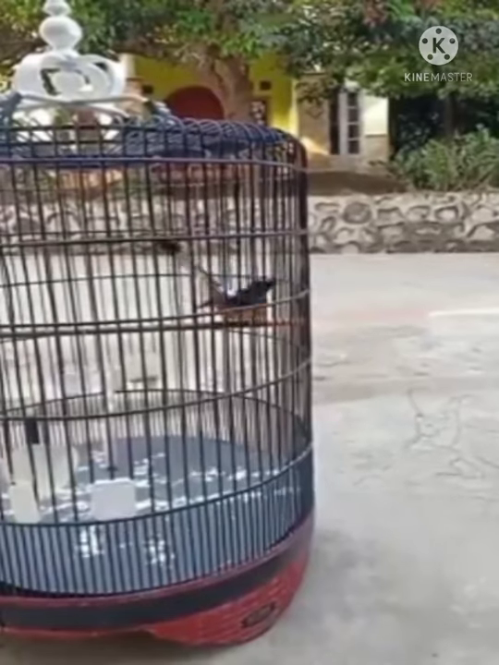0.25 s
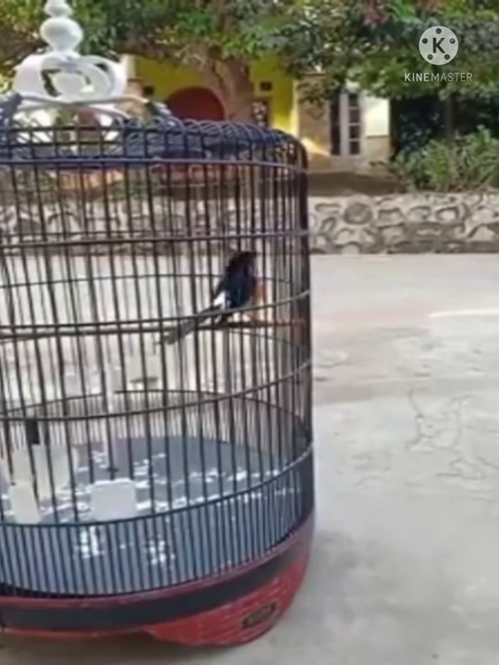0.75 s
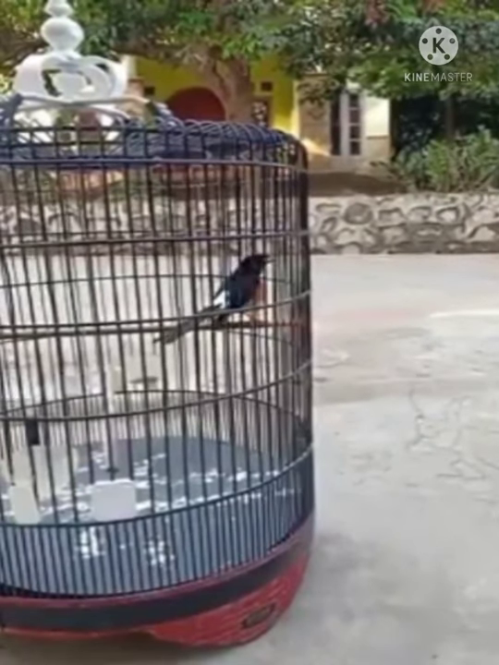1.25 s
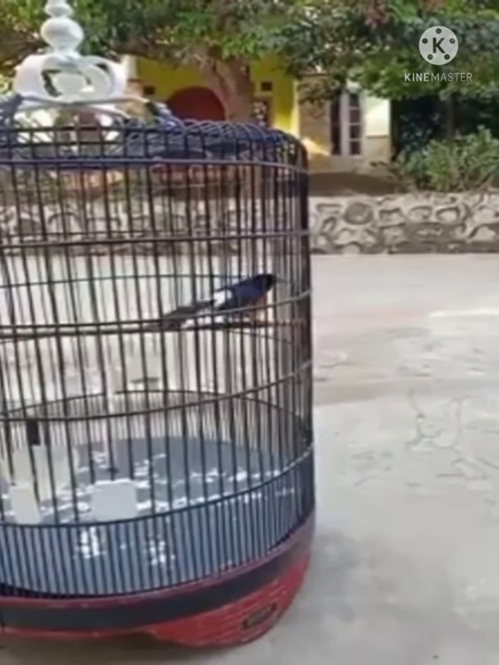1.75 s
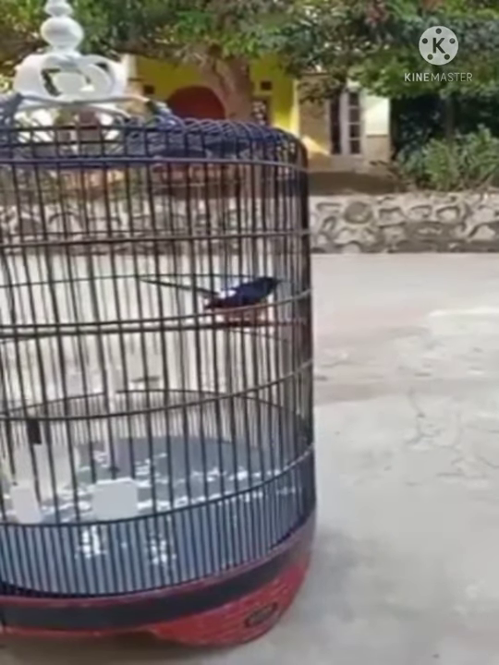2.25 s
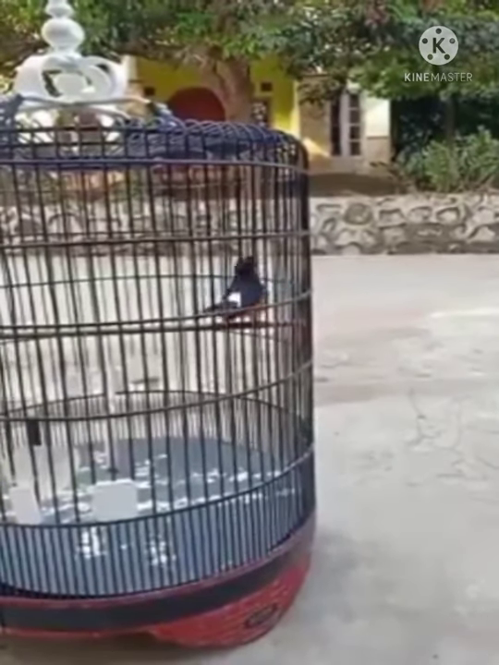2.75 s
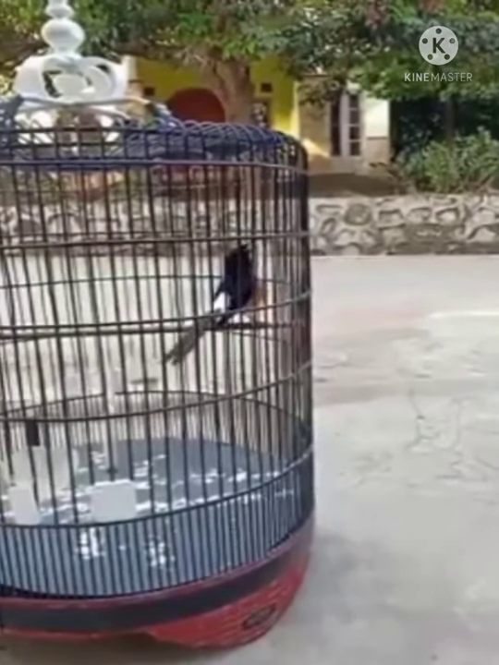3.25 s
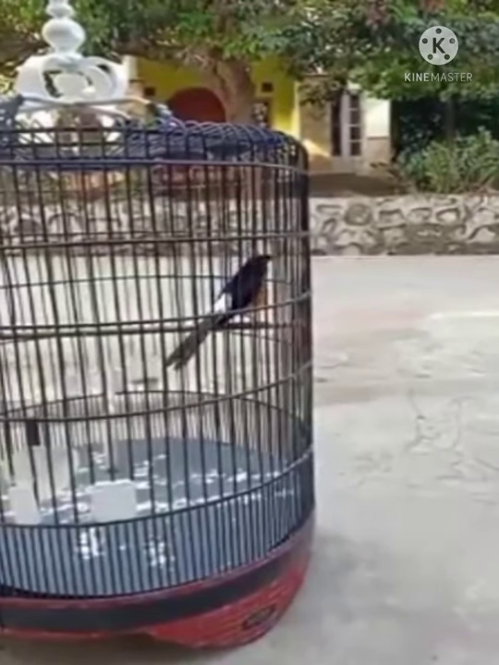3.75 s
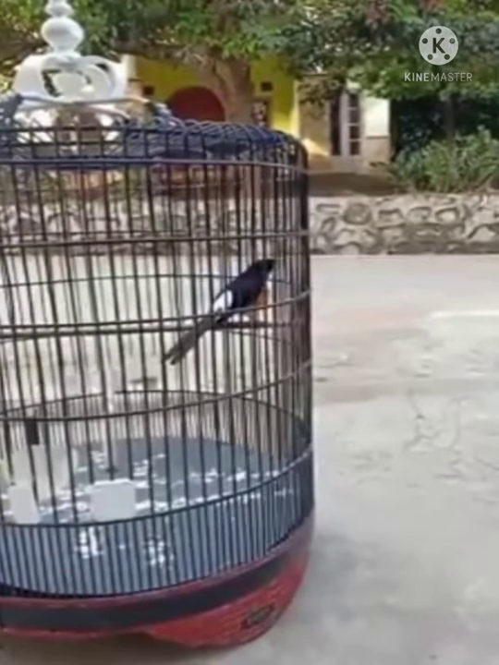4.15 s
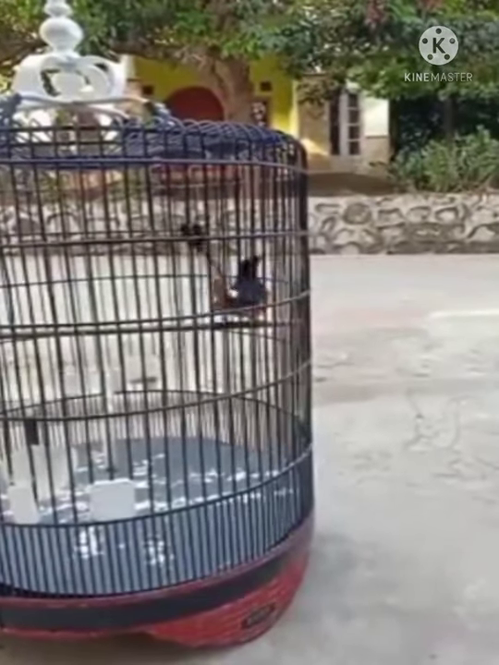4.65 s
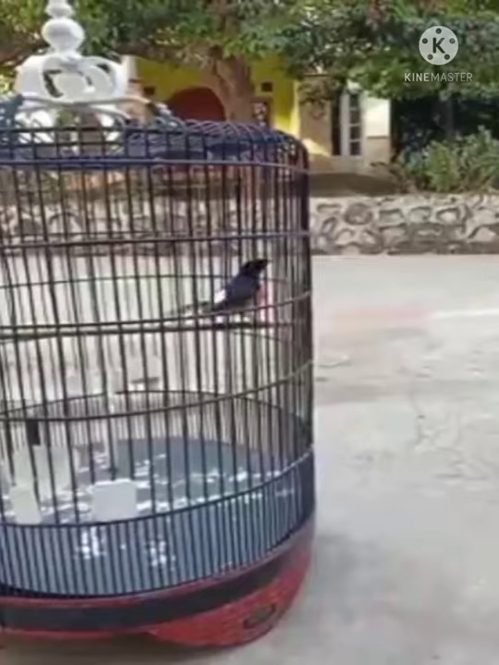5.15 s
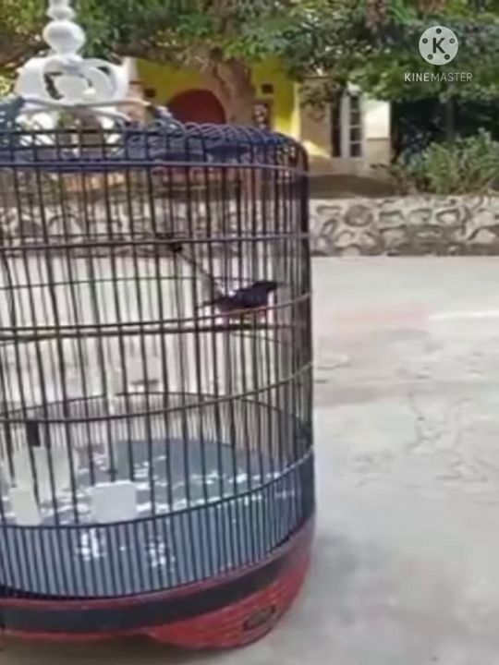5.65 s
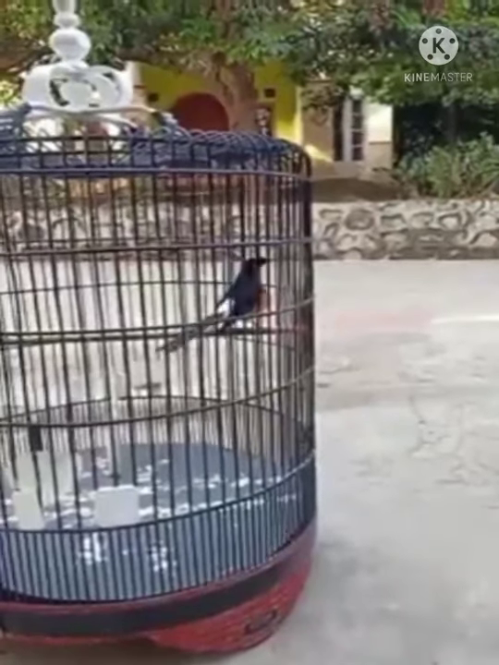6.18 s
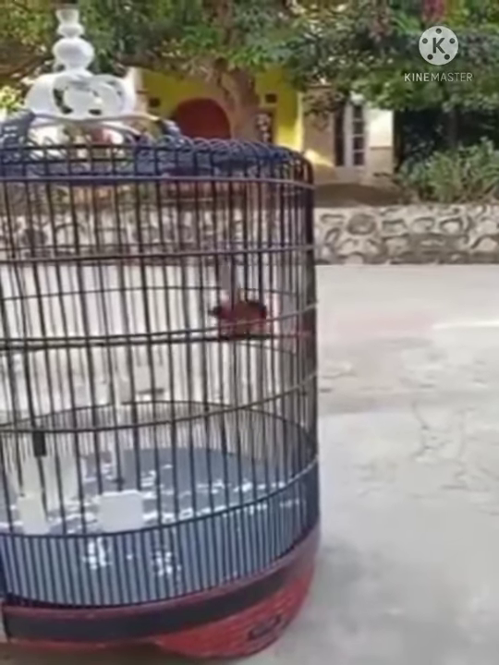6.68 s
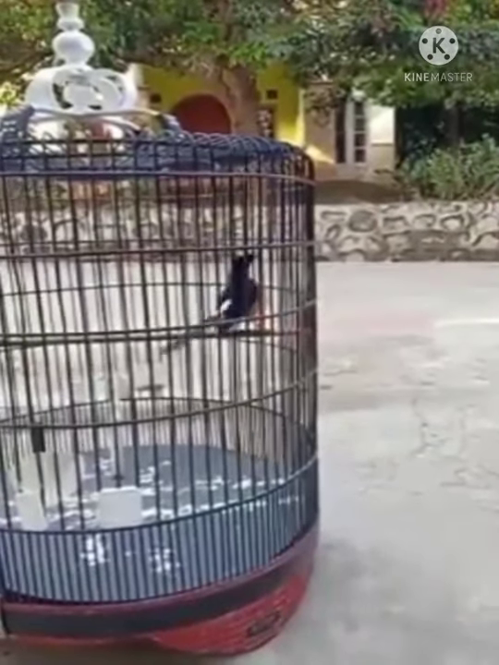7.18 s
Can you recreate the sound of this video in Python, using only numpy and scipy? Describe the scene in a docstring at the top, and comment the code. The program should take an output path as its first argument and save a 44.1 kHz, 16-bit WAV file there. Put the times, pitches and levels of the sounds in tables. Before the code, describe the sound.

A caged songbird close to the microphone chirps, then gives two loud, clear whistles, one rising and one sinking. Two quick phrases of yelps, swooping trills and hoarse squeals follow. A distant vehicle passes while other birds whistle farther off, and the songbird returns with three harsh rasps and a sharp chirp. A low engine putter and a wash of traffic lie underneath, in a yard with a slight echo.

```python
"""A few short chirps sound close by, over a puttering engine and a wash of traffic: a caged shama in a
paved yard. Its syrinx, a self-sustained oscillator, gives near-sine whistles, yelps, swooping trills and
squeals; irregular vibration turns them hoarse, and late in the song come a nasal chack and harsh rasps.
The walls throw the song back, other birds whistle farther off, and a distant vehicle passes.
The engine's firings ring its exhaust. The loudest notes overload the recorder."""
import sys
import numpy as np
from scipy import signal
from scipy.fft import rfft, irfft, next_fast_len
from scipy.io import wavfile
from scipy.ndimage import uniform_filter1d

SR = 44100
rng = np.random.default_rng(int(sys.argv[2]) if len(sys.argv) > 2 else 0)


def waveform_to_disk(signal):
    """Save audio, clipped to [-1, 1], as 16-bit WAV at the path in sys.argv[1]."""
    frames = np.transpose(np.atleast_2d(signal))
    scaled = np.clip(frames, -1, 1) * 32767
    samples = np.round(scaled).astype(np.int16)
    wavfile.write(sys.argv[1], SR, samples)


N = 327222
TIME = np.arange(N) / SR
PROGRESS = np.linspace(0, 1, 41)  # share of a note's length


def gain_of(db):
    """Amplitude grows tenfold every 20 dB."""
    return 10 ** (np.asarray(db) / 20)


def unit_rms(x):
    """Normalisation to rms 1."""
    return x / np.sqrt(np.mean(x ** 2) + 1e-20)


def value_at(spectrum, hz):
    """Interpolation on a log-frequency axis."""
    f, value = np.transpose(spectrum)
    return np.interp(np.log(hz + 1), np.log(f + 1), value)


def follow(rows, t=None):
    """Linear interpolation: times, then each column of a curve, sample by sample."""
    s, *columns = np.transpose(rows)
    t = np.arange(s[0], max(s[-1], s[0] + .005), 1 / SR) if t is None else t
    return [t] + [np.interp(t, s, c) for c in columns]


def add(mix, s, sound):
    """Superposition: a sound joins the mix at s seconds."""
    part = mix[max(round(s * SR), 0):][:len(sound)]
    part += sound[:len(part)]


def wander(size, hz):
    """Low-pass noise: a random drift of rms about 1, with its cutoff at hz."""
    length = next_fast_len(size + SR // 4)
    f = np.fft.rfftfreq(length, 1 / SR)
    return unit_rms(irfft(rfft(rng.standard_normal(length)) / (1 + (f / hz) ** 4), length))[:size]


def faded(x, edge_s=0.0016):
    """A raised-cosine taper keeps a note's ends from clicking."""
    t = np.arange(len(x)) / SR
    return x * np.sin(np.pi / 2 * np.clip(np.minimum(t, t[-1] - t) / edge_s, 0, 1)) ** 2


def filtered(x, spectrum):
    """Linear filtering: each frequency is scaled by the spectrum's gain."""
    length = next_fast_len(len(x) + 2048)
    response = gain_of(value_at(spectrum, np.fft.rfftfreq(length, 1 / SR)))
    return irfft(rfft(x, length) * response, length)[:len(x)]


def noise(size, spectrum):
    """Filtered white noise of rms 1."""
    return unit_rms(filtered(rng.standard_normal(size), spectrum))


def phase_of(hz, jitter):
    """Phase is the integral of frequency, here smoothed and trembling by the share jitter."""
    hz = uniform_filter1d(hz, size=130) * (1 + jitter * wander(len(hz), hz=210))
    return 2 * np.pi * np.cumsum(hz) / SR


def partials(phase, hz, multiples, spectrum):
    """Source and filter: each partial's strength depends on where it falls in the throat's response."""
    return sum(gain_of(value_at(spectrum, k * hz)) * (k * hz < SR / 2) * np.sin(k * phase)
               for k in multiples)


# Spectra of the clean overtones, hoarse partials and breath. Each row: frequency in Hz, level in dB.
CLEAN_SPECTRUM = [(1700, -16), (2300, -15.5), (2900, -34.5), (4500, -46.5), (6000, -60), (8300, -42.5),
                  (10500, -54), (13500, -49.5)]
GROWL_SPECTRUM = [(1500, -32), (2000, -18.5), (3000, -45), (5000, -11.5), (6200, -21), (8000, -19.5),
                  (11000, -44), (14000, -32)]
BREATH_SPECTRUM = [(1200, -36), (2200, -10), (3500, -1.5), (6300, -7.5), (8000, 3), (11000, -17.5),
                   (14000, -10), (15300, -24)]

def syrinx(rows, rough, attack_s=0.0038):
    """Self-sustained oscillation gives a near sine; roughness adds jitter, period doubling and hiss."""
    t, hz, db = follow(rows)
    phase = phase_of(hz, jitter=0.0026 + .025 * rough)
    scrape_hz = hz * .09 * rough ** 6 * wander(len(t), hz=500)
    phase += 2 * np.pi * np.cumsum(scrape_hz) / SR
    overtones = partials(phase, hz, (2, 4, 6), CLEAN_SPECTRUM)
    growl = partials(phase, hz, (.5, 1.5, 2, 2.5, 3, 3.5, 4), GROWL_SPECTRUM)
    breath = gain_of(-25 + 3.9 * wander(len(t), hz=120)) * noise(len(t), BREATH_SPECTRUM)
    tone = np.sin(phase) + overtones + rough ** 2 * growl + rough * breath
    shimmer_db = (1.16 + 3 * rough ** 2) * wander(len(t), hz=90)
    attack = np.minimum((t - t[0]) / attack_s, 1)
    return t[0], faded(tone * gain_of(db + shimmer_db) * attack)


def glide(s, length, start_hz, middle_hz, end_hz, db, swell_db, edge_db=-5):
    """A glissando: pitch follows a parabola through three points while the level swells or fades."""
    hz = np.polyval(np.polyfit([0, .5, 1], [start_hz, middle_hz, end_hz], 2), PROGRESS)
    level = db + swell_db * (PROGRESS - .5) + edge_db * np.abs(2 * PROGRESS - 1) ** 3
    return np.c_[s + length * PROGRESS, hz, level]


# The shama's chirps. Each row: start and length in seconds, first, middle and last pitch in Hz,
# level and swell in dB, roughness from 0 to 1.
CHIRP_NOTES = [(0, 0.054, 2577, 2620, 2730, -16, -13, 0.08), (0.122, .135, 1344, 1876, 1960, -23, 0, 0.2),
               (0.244, .06, 1997, 1820, 1870, -14, 1, 0.1),
               (2.717, 0.032, 1862, 2020, 1680, -20.5, -12, 0.8),
               (2.747, .018, 1790, 2040, 1980, -18, 4, 0.9), (2.911, 0.037, 2076, 1330, 2146, -23, 6, 0.6),
               (2.926, 0.013, 2790, 2600, 2470, -13, -4, 0.4),
               (2.949, .013, 2230, 2517, 2460, -6.5, -10, 0.2),
               (2.985, 0.023, 2510, 2407, 2430, -2, -1, 0.05), (3.027, .037, 2303, 2185, 2080, 0, -1, 0.08),
               (3.082, .038, 2174, 2067, 1838, -2.5, 7.5, 0.1),
               (4.322, 0.016, 2110, 1956, 2020, -20, 6, 0.8),
               (4.343, 0.0156, 2060, 2007, 1850, -17.5, 1, 0.5),
               (6.689, .028, 4360, 3980, 3330, -9.5, -3, 0.81),
               (6.712, 0.028, 2856, 2465, 2550, -14.5, -4, 0.97),
               (6.713, .013, 5630, 5550, 5200, -8, 6, 0.67), (6.722, .018, 4896, 4900, 5130, 0, -2, 0.53),
               (6.839, 0.03, 5150, 5690, 4590, -25, 9, 0.74),
               (6.95, 0.057, 2366, 3090, 5230, -27.5, 0, 0.88),
               (7.133, 0.021, 1990, 2350, 1630, -21.5, 1.5, 0.4),
               (7.354, 0.036, 725, 1396, 960, -32, -9, 0.53), (7.381, 0.039, 1127, 1004, 970, -32, -3, 0.3)]

def chirps():
    """Short frequency glides of the syrinx, from clean to hoarse."""
    return [syrinx(glide(*row), rough) for *row, rough in CHIRP_NOTES]


# The engine's running. Each row: time in seconds, firings per second, level in dB.
ENGINE_CURVE = [(0, 30.7, -35), (.45, 31, -36), (.9, 32.6, -45.5), (1.6, 33.2, -45.5), (2.4, 33.2, -47.5),
                (2.9, 29, -43.5), (3.5, 24, -58.5), (4.2, 25, -41), (5.1, 30, -47), (5.8, 27, -42.5),
                (6.2, 32, -36.5), (6.7, 29.6, -42.5), (7.42, 30.7, -40)]
# Exhaust resonances. Each row: frequency in Hz, relative level in dB, time to fall 60 dB in seconds.
EXHAUST_MODES = [(150.6, 5, 0.07), (160, -5, 0.15), (128.8, 0, 0.12)]

def engine(uneven_db=2.3, attack_s=0.0053):
    """Impulse excitation: each firing, a little uneven in strength, rings the exhaust's damped modes."""
    _, rate, db = follow(ENGINE_CURVE, TIME)
    firings = np.diff(np.floor(np.cumsum(rate) / SR + .85), prepend=0)
    firings *= gain_of(-uneven_db * rng.standard_normal(N))
    t = np.arange(SR // 8) / SR
    thump = sum(gain_of(d - 60 * t / t60) * np.sin(2 * np.pi * hz * t) for hz, d, t60 in EXHAUST_MODES)
    thump *= 1 - np.exp(-t / attack_s)
    return gain_of(db) * unit_rms(signal.oaconvolve(firings, thump)[:N])


def wash(spectrum, levels):
    """Broadband noise under slow amplitude modulation."""
    return noise(N, spectrum) * gain_of(follow(levels, TIME)[1] + .5 * wander(N, hz=2.3))


# Spectra of the low rumble and the traffic. Each row: frequency in Hz, relative density in dB.
RUMBLE_SPECTRUM = [(25, -33.5), (50, -18.5), (64, -9), (74, 9), (86, -16), (112, 6), (170, -8),
                   (240, -12.5), (300, -9.5), (420, -17.5), (600, -40.5), (1000, -39.5)]
TRAFFIC_SPECTRUM = [(200, -22), (330, -8.5), (530, -3.5), (700, -1.5), (850, -4.5), (1100, -4.5),
                    (1400, -8.5), (2000, -3), (2750, -4.5), (3800, -16.5), (6300, -16), (8000, -34),
                    (15000, -38)]
# Their envelopes. Each row: time in seconds, level in dB.
RUMBLE_LEVELS = [(0, -39.5), (1, -41.5), (3.201, -42), (3.7, -49), (4.3, -43), (7.42, -46)]
TRAFFIC_LEVELS = [(0, -42), (.5, -44.5), (1, -45.5), (2.499, -45.5), (3.299, -45), (4.1, -46), (4.5, -39),
                  (4.8, -39), (5.2, -32.5), (5.6, -35), (5.9, -38), (6.3, -41), (6.898, -44), (7.42, -43)]

def traffic():
    """Incoherent sources sum to noise: a low rumble under the wash of distant traffic."""
    return wash(RUMBLE_SPECTRUM, RUMBLE_LEVELS) + wash(TRAFFIC_SPECTRUM, TRAFFIC_LEVELS)


# Paths by way of the ground and walls. Each row: delay in seconds, gain in dB.
REFLECTIONS = [(.0031, -25), (.0172, -14.5), (.0305, -20), (.043, -26.5)]

def wall_echoes(shama):
    """Specular reflection: each surface returns a delayed, weaker copy of the song."""
    echoes = np.zeros(N)
    for delay, db in REFLECTIONS:
        add(echoes, delay, gain_of(db) * shama)
    return echoes


# The share of the song that the yard returns. Each row: frequency in Hz, gain in dB.
YARD_RETURN = [(1000, -9.5), (2000, -13.5), (3200, -10.5), (6000, -3.5), (12000, 3.5)]
# The yard's decay. Each row: frequency in Hz, time to fall 60 dB in seconds.
YARD_DECAY = [(500, 0.31), (1200, 0.29), (2500, 0.33), (5000, 0.26), (9000, 0.12), (15000, 0.14)]

def yard_reverb(shama, far_birds, onset_s=0.0032, reflections_per_s=2500):
    """Reverberation: scattered reflections die at each band's own rate, over a faint tail from houses."""
    taps = rng.choice([-1., 1.], SR) * (rng.random(SR) < reflections_per_s / SR)
    hz, t, bands = signal.stft(taps, SR, nperseg=256)
    houses = gain_of(-21.5 - 60 * t / 0.27)
    decay = gain_of(-60 * t / value_at(YARD_DECAY, hz)[:, None]) + houses
    response = signal.istft(bands * decay * np.minimum(t / onset_s, 1), SR, nperseg=256)[1]
    incident = filtered(shama, YARD_RETURN) + gain_of(-8.5) * far_birds
    return signal.fftconvolve(incident, response / np.linalg.norm(response))[:N]


def far_tone(rows, jitter, shimmer_db):
    """A wavering sine: at a distance only a whistle's fundamental carries."""
    t, hz, db = follow(rows)
    tone = np.sin(phase_of(hz, jitter))
    return t[0], faded(tone * gain_of(db + shimmer_db * wander(len(t), hz=88)), edge_s=0.0014)


# Whistles and hoots of other birds. Each row: start and length in seconds, first, middle and last
# pitch in Hz, level and swell in dB.
FAR_CALLS = [(0.134, 0.036, 884, 914, 920, -32.5, 7), (0.529, .19, 697, 726, 760, -42.5, -3),
             (1, 0.12, 808, 807, 783, -46, -2.5), (1.08, 0.21, 1165, 1160, 1188, -35.5, 0),
             (1.248, .091, 1593, 1614, 1610, -42, -5), (1.7, 0.064, 946, 924, 960, -38, 6),
             (2.465, 0.19, 1248, 1210, 1198, -35, 7), (3.2, 0.26, 1158, 1207, 1243, -43.5, 9),
             (3.45, 0.13, 404, 460, 487, -46.5, 3), (4.218, 0.11, 294, 299, 304, -48, -7),
             (5.273, 0.36, 1994, 2260, 2853, -28, 7), (5.31, 0.095, 1550, 1530, 1470, -33.5, 0),
             (5.322, 0.1, 353, 346, 340, -38, 3), (5.75, 0.12, 1898, 1857, 1835, -30.5, 7),
             (5.868, 0.19, 1860, 2340, 2800, -25, 0), (5.923, 0.08, 1220, 1320, 1420, -37, 0),
             (6.104, .145, 1198, 1460, 1940, -38.5, 16), (6.296, 0.13, 1258, 1460, 1872, -38.5, 15),
             (6.504, 0.11, 1979, 1647, 2040, -36, 12), (6.621, 0.13, 1991, 2143, 2182, -23.5, 12),
             (6.862, 0.094, 1836, 1727, 1520, -34, 5), (6.893, .096, 760, 772, 770, -42, 3),
             (6.999, 0.17, 1770, 1510, 1474, -36.5, -6), (7.155, 0.12, 1553, 1660, 1625, -37.5, -13)]

def far_whistles():
    """Distant birds are heard as nearly pure gliding tones."""
    return [far_tone(glide(*row), jitter=0.0021, shimmer_db=0.4) for row in FAR_CALLS]


def throb(rows, crest_s, rate_hz, dip_db, bend_hz, spread_s, sharpness):
    """Beats of a glide with its echo, drawn as even dips and pitch bends, deepest around crest_s."""
    t, hz, db = follow(rows)
    cycle = 2 * np.pi * rate_hz * (t - crest_s)
    depth = np.exp(-((t - crest_s) / spread_s) ** 2)
    hz += bend_hz * depth * np.cos(cycle + .9)
    db += dip_db * depth * np.abs(np.sin(cycle / 2)) ** sharpness
    return np.c_[t, hz, db]


# The shama's two long whistles. Each row: time in seconds, pitch in Hz, level in dB.
CLIMB_CURVE = [(.607, 1380, -34), (.69, 1215, -22), (.76, 1304, -16.5), (.83, 1391, -12.5), (.88, 1611, -9),
               (.955, 1866, 3), (1.01, 2023, 2.5), (1.07, 2213, -6.5), (1.118, 2330, -1),
               (1.135, 2525, -21.5)]
SINK_CURVE = [(1.277, 2076, -20), (1.303, 2090, -9), (1.355, 2034, -7), (1.398, 1996, 0),
              (1.452, 1996, 1.5), (1.5, 1976, .5), (1.561, 1897, 1.5), (1.574, 1790, -12.5)]

def long_whistles():
    """Two clean whistles, one climbing and one sinking, throb as they glide against their wall echo."""
    climb = throb(CLIMB_CURVE, crest_s=.917, rate_hz=23.6, dip_db=-15.5,
                  bend_hz=45, spread_s=0.18, sharpness=2.44)
    sink = throb(SINK_CURVE, crest_s=1.444, rate_hz=19.5, dip_db=-6,
                 bend_hz=-10.5, spread_s=0.082, sharpness=5)
    return syrinx(climb, rough=0.018), syrinx(sink, rough=0.01)


# A distant bird's long high note. Each row: time in seconds, pitch in Hz, level in dB.
FAR_NOTE_CURVE = [(1.2, 2510, -52.5), (1.38, 2860, -43.5), (1.5, 2914, -37), (1.9, 2932, -30),
                  (2.2, 2942, -28.5), (2.5, 2974, -25.5), (2.85, 3008, -28), (3, 2917, -29)]

def far_long_note():
    """Random modulation broadens a spectral line, so the held note sounds fuzzy."""
    return far_tone(FAR_NOTE_CURVE, jitter=0.011, shimmer_db=3.0)


# Low slurs that open a phrase. Each row: start in seconds, pitch in Hz, level in dB.
SLUR_NOTES = [(1.77, 1088, -14.5), (3.335, 1072, -16.5)]
# One slur's course. Each row: time from its start in seconds, pitch ratio, relative level in dB.
SLUR_CURVE = [(0, 1.12, 6.5), (.01, .93, -2.5), (0.036, 1.01, -2), (0.058, .9, 3), (0.082, .89, -1),
              (0.11, .77, -11.5), (0.122, 1.12, -20), (.136, 1.53, -9), (0.152, 1.6, -2),
              (0.166, 1.7, -12.5)]

def slurs():
    """A frequency glide that sags, then leaps up."""
    for s, hz, db in SLUR_NOTES:
        yield syrinx(np.array(SLUR_CURVE) * [1, hz, 1] + [s, 0, db], rough=0.19)


# The yelps' scoops. Each row: start and length in seconds, first and last pitch in Hz, level in dB.
YELP_NOTES = [(2.008, 0.041, 1428, 1758, 2.5), (2.102, .028, 1375, 1864, -0.5),
              (3.58, .033, 1353, 1716, -3.5), (3.684, .031, 1357, 1904, 0)]
# The flick. Each row: time from the scoop's start in seconds, pitch in Hz, relative level in dB.
FLICK_CURVE = [(-.012, 1586, -24), (-.005, 1850, -14.5), (.002, 1990, -15)]

def yelps(bend=0.784, crest_share=0.71):
    """A quick flick, then a power-law frequency sweep that scoops upward and swells to a crest."""
    for s, length, start_hz, end_hz, db in YELP_NOTES:
        yield syrinx(np.array(FLICK_CURVE) + [s, 0, db], rough=0.31)
        hz = start_hz + (end_hz - start_hz) * PROGRESS ** bend
        level = db + np.interp(PROGRESS, [0, crest_share, 1], [-10, 0, -6.5])
        yield syrinx(np.c_[s + length * PROGRESS, hz, level], rough=0.15)


# The trills' swoops. Each row: time of the top in seconds, levels of the fall and of the rise in dB,
# length of the rise in seconds.
SWOOP_NOTES = [(2.131, -4.5, -13.5, 0.045), (2.213, -7.5, -9, 0.014), (2.284, -13.5, -11.5, 0.014),
               (2.346, -26, -15.5, 0.0073), (2.409, -37, -19, .013), (3.716, -3.5, -14, 0.033),
               (3.798, -11.5, -12.5, 0.014), (3.871, -18, -14.5, 0.013), (3.934, -30, -18.5, 0.012)]

def swoops(top_hz=1828, knee_hz=975.6, low_hz=849, turn_s=.041):
    """Deep frequency modulation: the pitch drops an octave, the voice almost stops, then flicks up."""
    for s, fall_db, rise_db, rise_s in SWOOP_NOTES:
        fall = [(s - .017, top_hz * .87, fall_db - 4),
                (s, top_hz, fall_db),
                (s + .014, knee_hz, fall_db - 10),
                (s + .017, low_hz, rise_db - 25.5)]
        rise = [(s + turn_s, knee_hz * .98, rise_db),
                (s + turn_s + rise_s / 2, knee_hz * 1.32, rise_db - 8),
                (s + turn_s + rise_s, top_hz * 1.1, rise_db - 16)]
        yield syrinx(fall + rise, rough=0.25)


# Piping notes. Each row: start in seconds, length ratio, level in dB.
PIPE_NOTES = [(2.596, .88, 3), (4.154, 0.94, 2.5)]
# One note's course. Each row: time in seconds before stretching, pitch in Hz, relative level in dB.
PIPE_CURVE = [(0, 2095, -32), (.008, 2203, -15), (.014, 2472, -3), (.021, 2518, 0), (.034, 2220, -2.5),
              (.04, 2413, -3), (0.045, 2730, -12)]

def pipes():
    """Nearly periodic vibration gives the loud, clear note that opens each chain of squeals."""
    for s, stretch, db in PIPE_NOTES:
        yield syrinx(np.array(PIPE_CURVE) * [stretch, 1, 1] + [s, 0, db], rough=0.088)


# Squeals. Each row: start and length in seconds, top pitch in Hz, level in dB, roughness from 0 to 1.
SQUEAL_NOTES = [(2.632, .034, 3644, 1, 0.48), (2.667, .043, 4000, -8, 0.91), (2.706, .042, 4016, -5, 0.73),
                (4.191, .033, 3586, -3.5, 0.35), (4.225, .041, 3710, -3.5, 0.34),
                (4.267, .049, 4065, -6.5, 0.73), (4.315, .028, 3740, -13, .6)]
# The response of throat and beak. Each row: frequency in Hz, gain in dB.
BEAK_RESPONSE = [(4200, -0.5), (4450, -12), (5000, 3), (6300, 4), (6900, -16), (8000, 0), (11000, -2),
                 (14300, 5), (15200, -9)]

def squeals(base_hz=2199, skew=1.25, edge_db=-11, tilt_db=-9):
    """Source and filter: pitch and level rise and fall in hoarse arches, coloured by throat and beak."""
    arch = np.abs(np.sin(np.pi * PROGRESS ** skew)) ** .9  # the climb is slower than the drop
    for s, length, top_hz, db, rough in SQUEAL_NOTES:
        hz = base_hz + (top_hz - base_hz) * arch
        level = db + edge_db * (1 - arch) + tilt_db * (PROGRESS - .5)
        start, sound = syrinx(np.c_[s + length * PROGRESS, hz, level], rough)
        yield start, faded(filtered(sound, BEAK_RESPONSE))


# A vehicle's drone and tyre hiss. Each row: frequency in Hz, relative density in dB.
VEHICLE_SPECTRUM = [(90, -13), (160, 13), (240, -3), (520, -7), (620, 4.5), (720, 6), (830, -16),
                    (2500, -6.5), (4000, -12), (6400, -12.5), (10500, -23), (13000, -20), (15500, -24.5)]
# Its envelope. Each row: time in seconds, level in dB.
VEHICLE_LEVELS = [(0, -63.5), (1, -66), (4.1, -58), (4.5, -44), (4.9, -36.5), (5.2, -35), (5.55, -33.5),
                  (5.9, -41), (6.399, -51), (7.42, -66)]

def passing_vehicle():
    """Level falls with distance: the noise swells as a far vehicle nears and fades as it leaves."""
    return wash(VEHICLE_SPECTRUM, VEHICLE_LEVELS)


# The nasal chack. Each row: time in seconds, fundamental in Hz, level in dB.
CHACK_CURVE = [(4.857, 1066, -36), (4.871, 1140, -19.5), (4.882, 1196, -10), (4.893, 1272, -12.5),
               (4.902, 1322, -15.5), (4.912, 1330, -25)]
# Its spectrum. Each row: harmonic number, relative level in dB.
CHACK_HARMONICS = [(2, -2.5), (3, -1.5), (4, -4), (5, -16.5), (6, -28), (7, -37), (9, -27), (11, -29)]

def chack(breath_db=-20, scratch_db=-28, scratch_s=0.013):
    """A missing fundamental: a scratch of air opens a harmonic stack whose base the throat holds back."""
    t, hz, db = follow(CHACK_CURVE)
    phase = phase_of(hz, jitter=0.012)
    stack = sum(gain_of(d) * np.sin(round(k) * phase) for k, d in CHACK_HARMONICS)
    scratch = gain_of(scratch_db) * np.exp((t[0] - t) / scratch_s)
    breath = noise(len(t), BREATH_SPECTRUM) * (gain_of(db + breath_db) + scratch)
    return t[0], faded(gain_of(db) * stack + breath)


# Rasps. Each row: start in seconds, level in dB, length ratio, pitch ratio.
RASP_NOTES = [(6.457, -5, 1, 1.02), (6.533, -6.5, 1.08, 0.97), (6.609, -7, 1.2, 1)]
# One rasp's course before scaling. Each row: time in seconds, pitch in Hz, level in dB, flutter depth
# as a share of the pitch, relative level of the octave in dB.
RASP_CURVE = [(0, 2285, -10, .01, 3), (.004, 2335, -12.5, 0.013, 6.5), (.009, 2273, -11.5, 0.022, 9),
              (.012, 4434, 3.5, .25, -24), (.016, 3064, -8, .22, 2.5), (.022, 3100, -2.5, .08, 4.5),
              (.031, 3168, -4.5, 0.05, 3.5), (.04, 3234, -15.5, 0.043, -10.5), (.06, 3210, -22, .06, 1)]

def rasps(flutter_hz=430, breath_db=-16):
    """Fast, uneven frequency modulation breaks a clean lead-in into harsh sidebands, with rushing air."""
    for s, level_db, stretch, pitch in RASP_NOTES:
        t, hz, db, depth, octave_db = follow(np.array(RASP_CURVE) * [stretch, pitch, 1, 1, 1])
        flutter_rate = flutter_hz * (1 + .25 * wander(len(t), hz=210))
        flutter = np.sin(2 * np.pi * np.cumsum(flutter_rate) / SR)
        flutter += .35 * wander(len(t), hz=900)  # the membranes never repeat a swing exactly
        phase = 2 * np.pi * np.cumsum(hz * (1 + depth * flutter)) / SR
        tone = np.sin(phase) + gain_of(octave_db) * np.sin(2 * phase)
        tone += gain_of(-25) * np.sin(3 * phase) + gain_of(-13.5) * np.sin(4 * phase)
        tone += gain_of(breath_db) * noise(len(t), BREATH_SPECTRUM)
        yield s, faded(tone * gain_of(level_db + db))


def scene():
    """Superposition: the shama near, other birds far, their reflections, and the street behind."""
    shama, far_birds = np.zeros((2, N))
    for s, sound in [*long_whistles(), *slurs(), *yelps(), *swoops(), *pipes(), *squeals(),
                     *chirps(), *rasps(), chack()]:
        add(shama, s, sound)
    for s, sound in [*far_whistles(), far_long_note()]:
        add(far_birds, s, sound)
    birds = shama + wall_echoes(shama) + far_birds + yard_reverb(shama, far_birds)
    street = traffic() + passing_vehicle() + engine()
    return (birds + street)[None]


# The microphone's response, stepping down in the high treble. Each row: frequency in Hz, gain in dB.
MICROPHONE_RESPONSE = [(6500, -0.5), (7200, -11), (15000, -5)]

def record(dry, ceiling_db=-1.05, cutoff_hz=15650):
    """Saturation: after the microphone, the loudest notes flatten at a ceiling; a low-pass follows."""
    heard = filtered(dry[0], MICROPHONE_RESPONSE)
    clipped = heard / (1 + np.abs(heard / gain_of(ceiling_db)) ** 40) ** (1 / 40)
    low_pass = signal.firwin(511, cutoff_hz, window=("kaiser", 9), fs=SR)
    return signal.oaconvolve(clipped, low_pass, "same")[None]


dry = scene()
out = record(dry)
waveform_to_disk(out)
```